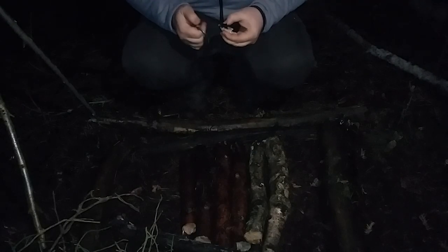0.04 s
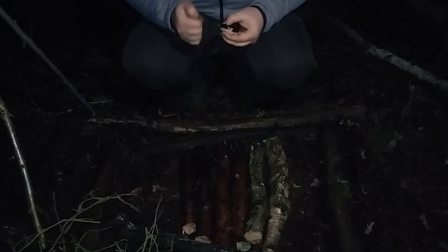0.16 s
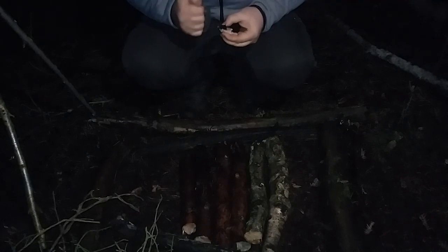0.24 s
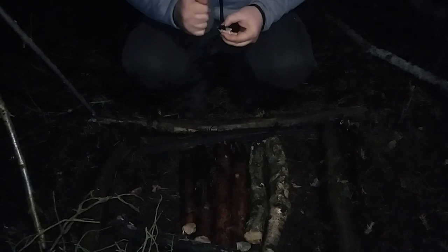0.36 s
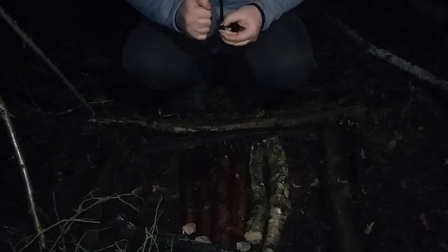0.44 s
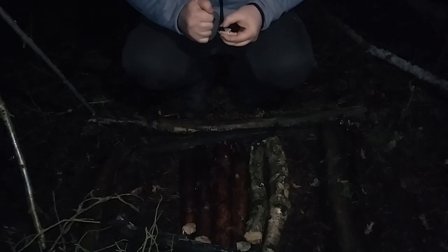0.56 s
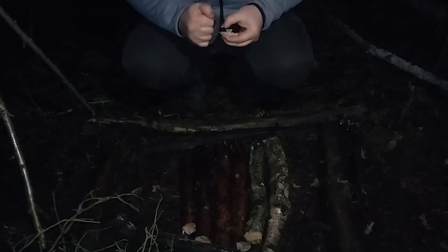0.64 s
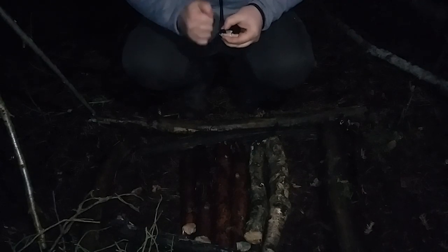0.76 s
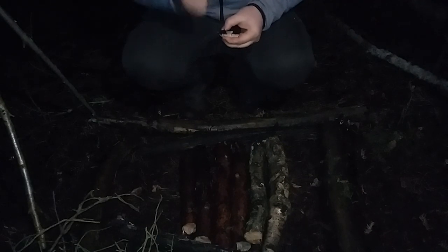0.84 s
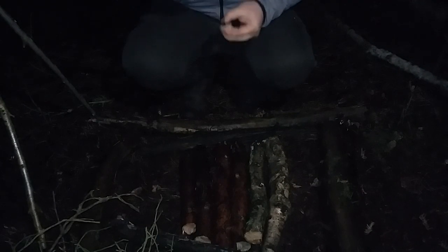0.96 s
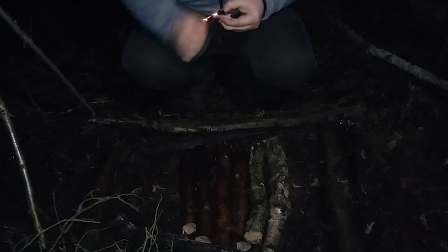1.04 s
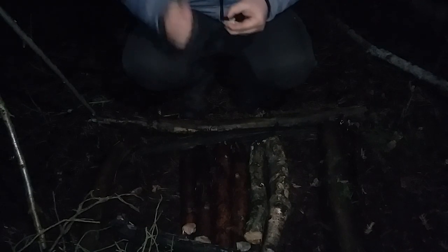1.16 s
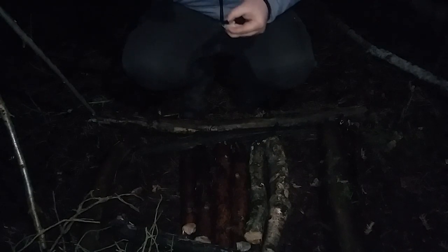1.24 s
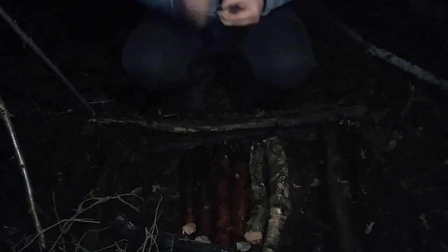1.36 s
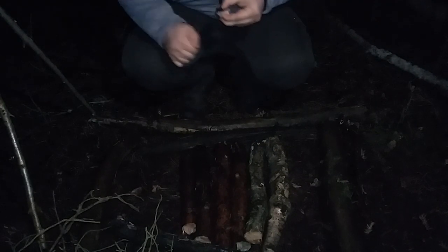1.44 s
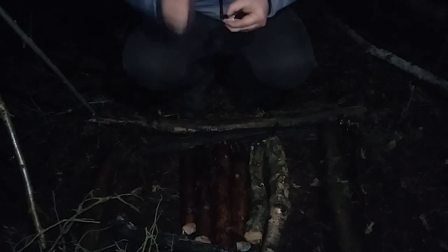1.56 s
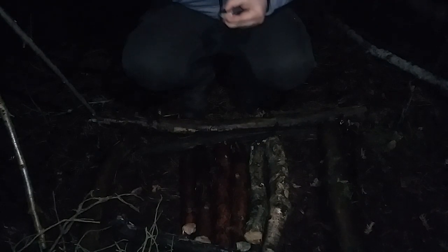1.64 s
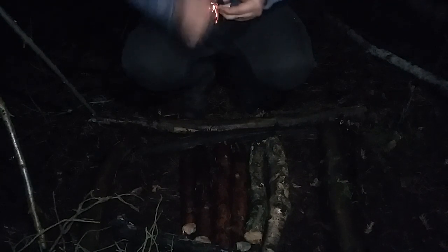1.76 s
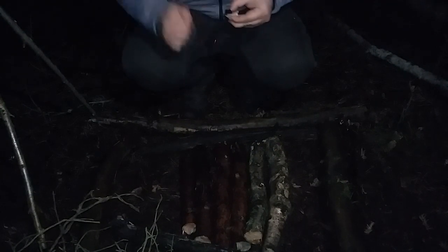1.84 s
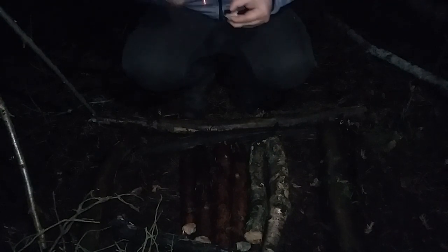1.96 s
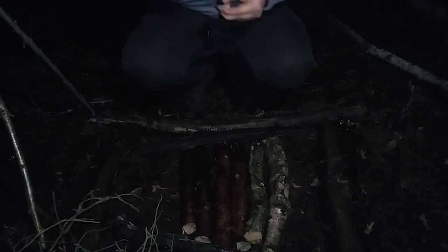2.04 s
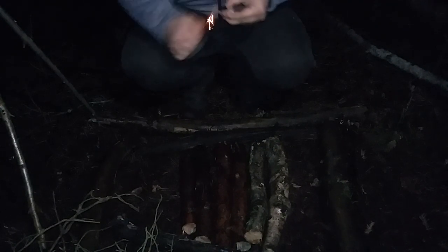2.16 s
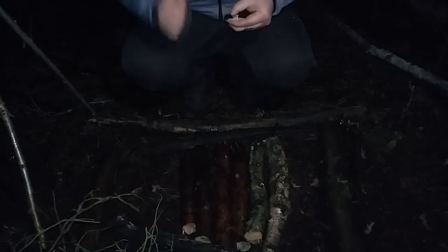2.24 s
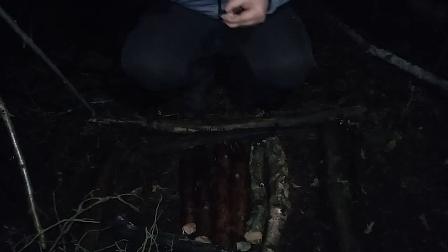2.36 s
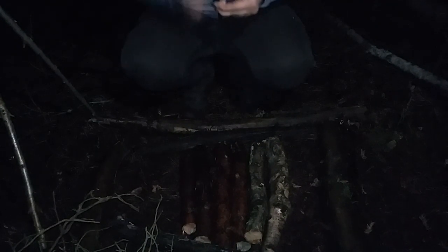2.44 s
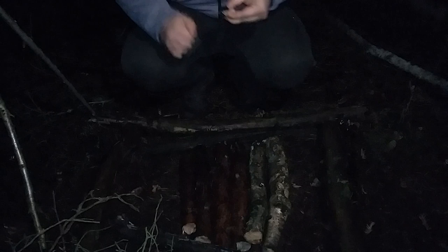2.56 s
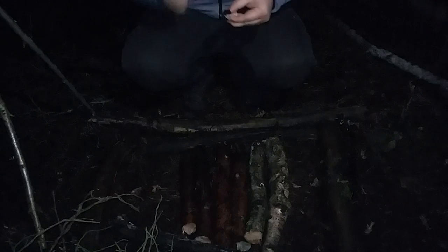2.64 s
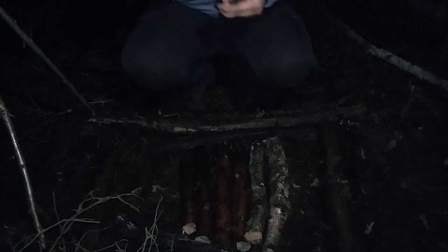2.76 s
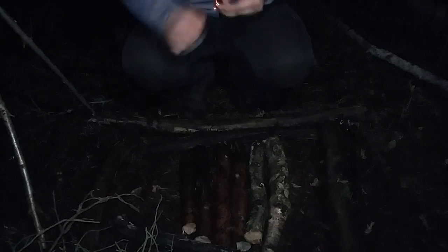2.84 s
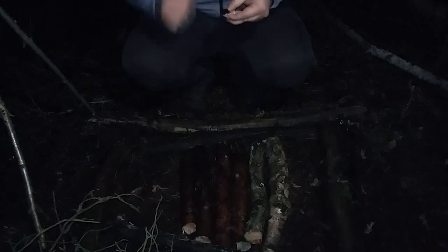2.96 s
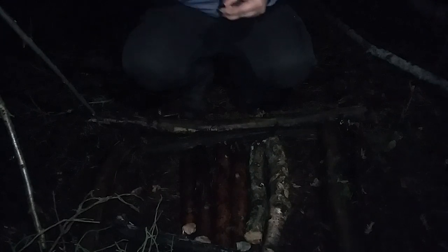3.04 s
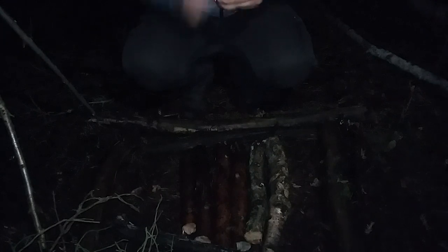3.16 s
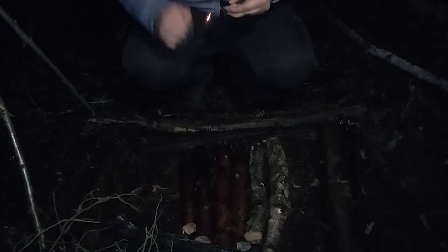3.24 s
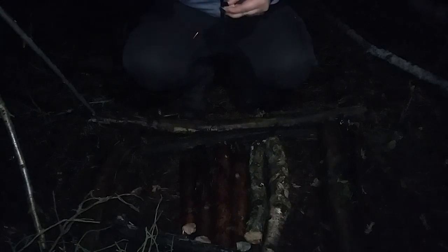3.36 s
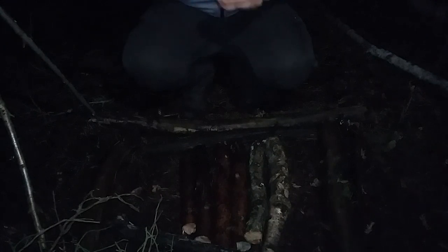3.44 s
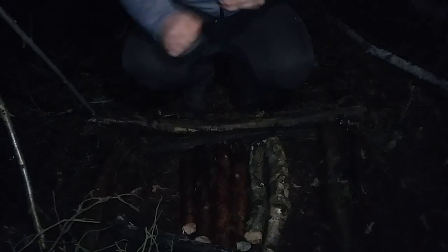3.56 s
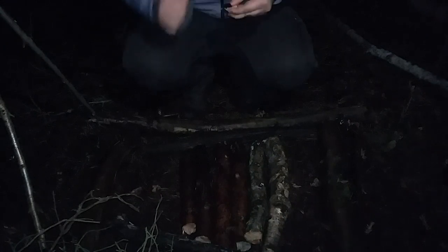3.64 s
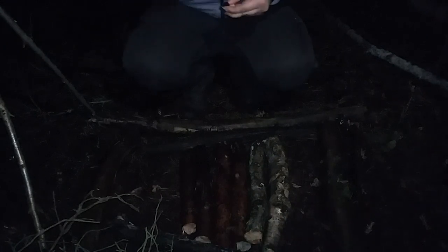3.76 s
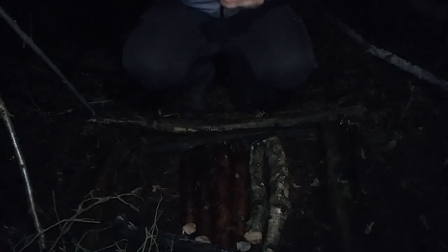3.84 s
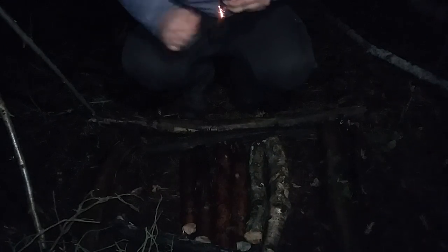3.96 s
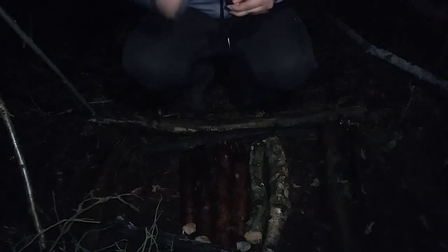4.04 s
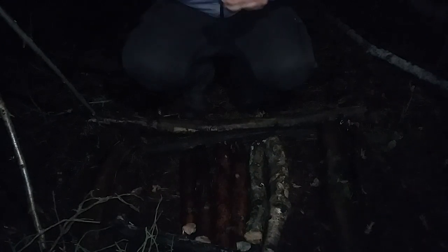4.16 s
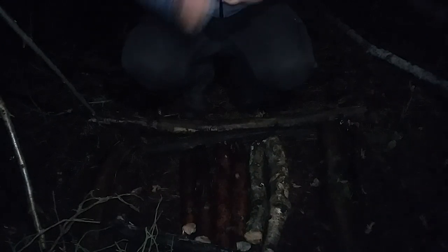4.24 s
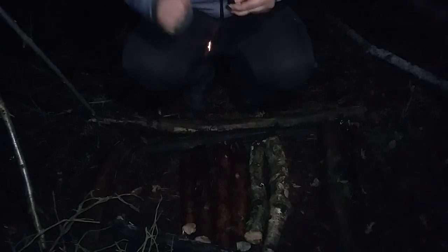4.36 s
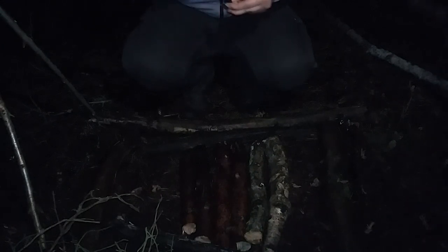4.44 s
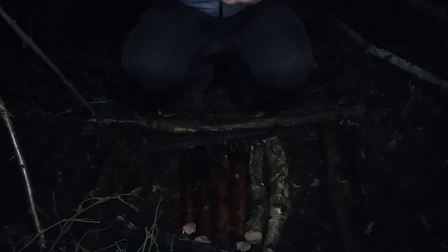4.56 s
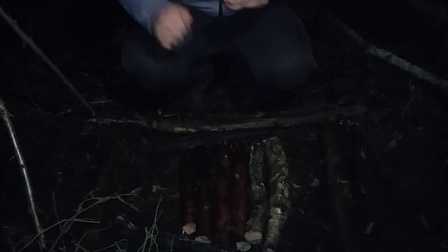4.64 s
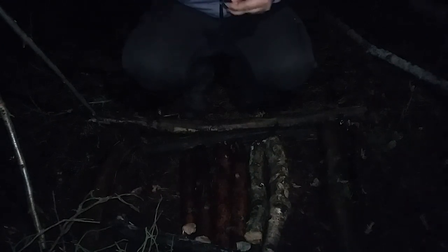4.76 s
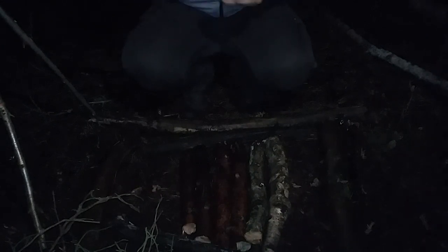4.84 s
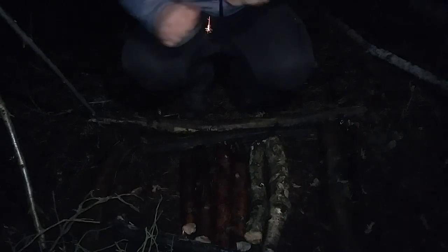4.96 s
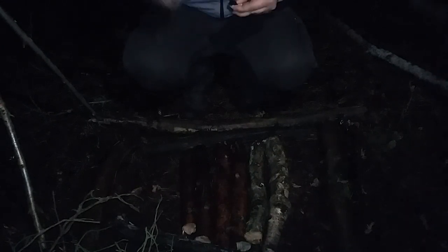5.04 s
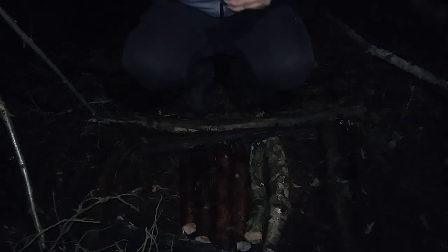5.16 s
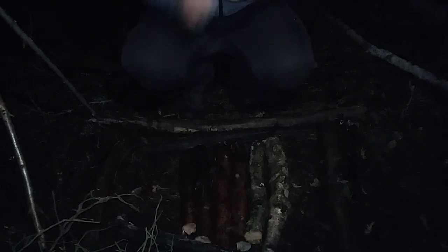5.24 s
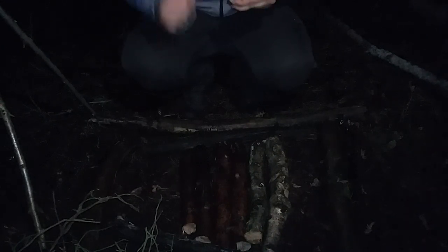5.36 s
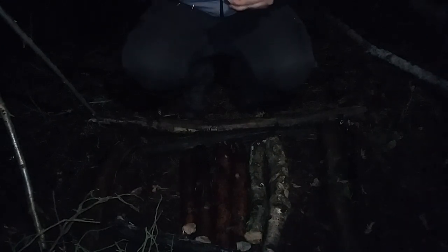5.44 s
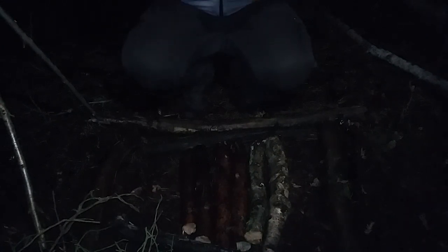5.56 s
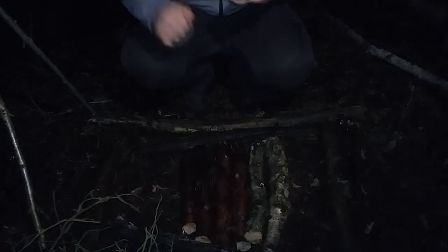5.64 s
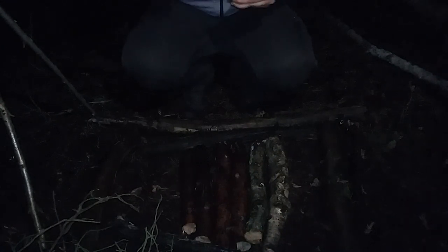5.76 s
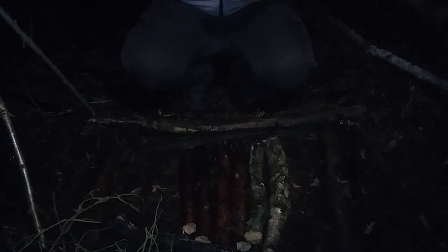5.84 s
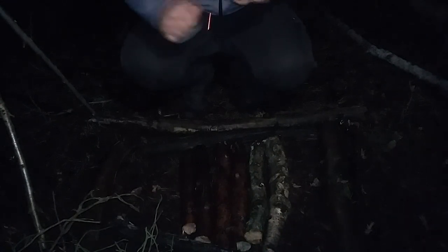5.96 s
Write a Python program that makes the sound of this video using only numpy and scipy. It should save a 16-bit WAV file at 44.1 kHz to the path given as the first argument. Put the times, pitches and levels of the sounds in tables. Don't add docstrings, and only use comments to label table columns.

```python
import sys
import numpy as np
from scipy import signal
from scipy.fft import irfft, next_fast_len
from scipy.io import wavfile
from scipy.ndimage import uniform_filter1d

SR = 44100
rng = np.random.default_rng(int(sys.argv[2]) if len(sys.argv) > 2 else 0)


def invert_db(level):
    return 10 ** (np.asarray(level, dtype=float) / 20)


def generate_wav(sig):
    pcm = np.round(np.clip(np.atleast_2d(sig).T, -1, 1) * 32767).astype(np.int16)
    wavfile.write(sys.argv[1], SR, pcm)


N = 265041

# (time [s], peak level [dB], rod ring [Hz], looseness of grip [dB], sharpness of the cut [dB])
BITES = [(0.614, -29.5, 3000, -2, -49), (1.0983, -14, 3270, -1, -10.5), (1.4478, -17.5, 2660, 4.5, -4.5),
         (1.8154, -8, 2750, -2, -2), (2.1735, -6, 2930, -2.5, -3), (2.544, -7, 2584, -1.5, 1.5),
         (2.8878, -4.5, 2900, -3, 1.5), (3.234, -9, 2680, 0.5, 0), (3.5711, -7.5, 2710, 1, 5.5),
         (3.9698, -6.5, 2800, -6.5, -14), (4.317, -9.5, 2500, 4, 7), (4.6565, -7, 2690, 0, -13.5),
         (4.9813, -11.5, 3050, 5.5, -15.5), (5.3263, -9.5, 2790, 3.5, 8), (5.6535, -6, 2760, 1, 1.5),
         (5.9718, -14, 2600, 7, 4.5)]

# (centre [Hz], width [Hz], level [dB], left minus right [dB])
HANDLE = [
    (1350, 160, 0, -1),
    (1860, 161, 0, -7),
]
STRIKER = [
    (3667, 560, 6.5, 4.3),
    (3900, 53, 2.5, 9.3),
    (3740, 400, -19, 2.4),
]
TIP = [
    (5400, 4500, -6.5, 4),
    (6050, 320, -11.5, 4.8),
    (6150, 610, 3, 1.9),
    (6550, 500, 3, 3.4),
]
EDGE = [
    (8250, 440, -6, 5),
    (8760, 260, -3, 6),
]
# (centre [Hz], width [Hz], level [dB], left minus right [dB])
TEARING = [
    (10500, 500, -6.5, -7),
    (12700, 1200, 2, 5.5),
    (14800, 1300, -5, -2.5),
]

BUFFER, LEAD_S = 4096, .005


def level(x, db):
    return x * invert_db(db) / np.sqrt(np.mean(x ** 2))


def ring(x, hz, width_hz):
    return signal.lfilter(*signal.iirpeak(hz, hz / width_hz, fs=SR), x)


def edge(x, hz, kind, order=2):
    return signal.sosfilt(signal.butter(order, hz, kind, fs=SR, output="sos"), x)


def walk(rate):
    hold = int(SR / rate)
    held = np.repeat(rng.standard_normal(N // hold + 1), hold)
    return 1.3 * uniform_filter1d(uniform_filter1d(held, hold), hold)[:N]


def curve(table):
    times, *columns = np.transpose(table)
    return [np.interp(np.arange(N) / SR, times, column) for column in columns]


def coloured(shape, lo_hz, hi_hz):
    size = next_fast_len(N)
    ln_hz = np.log(np.maximum(np.fft.rfftfreq(size, 1 / SR), 1))
    shape_hz, shape_db = np.transpose(shape)
    db = np.interp(ln_hz, np.log(shape_hz), shape_db)
    low_edge = 1 + np.exp(8 * (np.log(lo_hz) - ln_hz))
    high_edge = 1 + np.exp(8 * (ln_hz - np.log(hi_hz)))
    real, imaginary = rng.standard_normal((2, len(db)))
    spectrum = (real + 1j * imaginary) * invert_db(db) / np.sqrt(low_edge * high_edge)
    return level(irfft(spectrum, size)[:N], 0)


def pan_gain(pan_db):
    return invert_db(np.array([[pan_db], [-pan_db]]) / 2)


def body(force, modes):
    out = 0
    for k, (hz, width_hz, db, pan_db) in enumerate(modes):
        out = out + (-1) ** k * invert_db(db) * pan_gain(pan_db) * ring(force, hz, width_hz)
    return out / np.abs(out).max()


def grit(envelope, scatter_db):
    sign, size = rng.standard_normal((2, BUFFER))
    return envelope * sign * invert_db(scatter_db * np.abs(size))


def regrip(modes):
    detune = 1 + .03 * np.tanh(rng.standard_normal())
    return [(hz * detune, *rest) for hz, *rest in modes]


def place(out, sound, s):
    start = int((s - LEAD_S) * SR)
    out[:, start:start + BUFFER] += sound


def bites():
    # (level [dB], change per looseness [dB/dB], change per sharpness [dB/dB])
    parts = [
        (-13.5, 1.3, .01),
        (-4, 1.14, 0.25),
        (-16.5, -0.06, .4),
        (-23.5, -0.35, 1.1),
        (-40.5, 0.7, 0.1),
    ]
    out = np.zeros((2, N + 8192))
    ms = (np.arange(BUFFER) / SR - LEAD_S) * 1000
    run_up = .06 * np.exp(np.minimum(ms, 0) / .55)
    trail = np.exp(-ms / 2.07) + 0.066 * np.exp(-ms / 11)
    skid = np.where(ms < 0, run_up, trail)
    impact = np.arange(BUFFER) == np.searchsorted(ms, 0)
    for s, db, rod_hz, loose_db, sharp_db in BITES:
        grains = invert_db(-19.5) * grit(skid, 5.7)
        force = grains + impact
        push = edge(force, 5200, "low")
        rings = [body(push, HANDLE), body(push, regrip(STRIKER)), body(push, regrip(TIP)),
                 body(force, regrip(EDGE)), body(grains, TEARING)]
        sound = invert_db(-2) * body(push, [(rod_hz, 512, 0, -3), (2382, 300, 2.5, -2)])
        for part, (base_db, per_loose, per_sharp) in zip(rings, parts):
            sound = sound + invert_db(base_db + per_loose * loose_db + per_sharp * sharp_db) * part
        place(out, invert_db(db) * pan_gain(1.4) * sound, s)
    return out[:, :N]


def catches():
    # (time [s], level [dB], ring [Hz], length [ms])
    edge_catches = [(1.4512, -19, 2750, .7), (1.4583, -24.5, 3770, 4), (1.461, -26.5, 2720, 4),
                    (1.8187, -15, 2360, 3.9), (1.8262, -19.5, 2420, 1.5), (1.83, -31, 2330, 3),
                    (2.184, -18.5, 2430, 2.1), (2.188, -22.5, 2400, 2.8), (2.5533, -14.5, 2570, 2.2),
                    (2.8909, -19, 2580, 1.5), (2.899, -22.5, 1880, 3.2), (3.2472, -21.5, 2680, 6),
                    (3.5771, -17.5, 3000, 3.4), (3.5792, -12.5, 3050, 2.7), (3.5879, -21.5, 1880, 4),
                    (3.968, -16, 2810, .6), (3.9714, -17.5, 2630, 2.7), (3.976, -20, 2430, 2.1),
                    (3.9795, -13, 2510, 2.1), (4.3282, -26, 2470, 1.6), (4.332, -18, 2743, 1.5),
                    (4.6628, -18, 3370, 1.8), (4.6656, -26, 2553, 1.5), (4.9926, -26.5, 2170, 6),
                    (5.333, -30.5, 2700, 3), (5.652, -14, 3900, .4), (5.6567, -20, 2780, 1.1),
                    (5.6606, -19, 2670, 2.1), (5.9797, -18, 2980, 6), (5.9863, -14.5, 2720, 3.3)]
    out = np.zeros((2, N + 8192))
    ms = (np.arange(BUFFER) / SR - LEAD_S) * 1000
    for s, db, rod_hz, length_ms in edge_catches:
        skid = np.exp(-.5 * (ms / (.45 * length_ms)) ** 2)
        grains = grit(skid, 4.0)
        push = edge(grains, 4500, "low", order=3)
        sound = body(push, [(rod_hz, 320, 0, -1.5)])
        sound += invert_db(-6) * body(push, STRIKER + TIP)
        sound += invert_db(-33.5) * body(push, HANDLE)
        sound += invert_db(-42.5) * body(grains, EDGE + TEARING)
        place(out, invert_db(db - 1.0) * sound, s)
    return out[:, :N]


def sparks():
    # (frequency [Hz], level [dB/Hz])
    fizz = [
        (1500, -9),
        (2600, -6),
        (4100, -2),
        (5500, -11.5),
        (7000, -17),
        (9000, -20.5),
        (11000, -30.5),
        (16000, -41.5),
    ]
    t = np.arange(N) / SR
    glow = 0
    for s, peak_db, *_, sharp_db in BITES:
        db = peak_db - 50.5 + 0.37 * sharp_db
        age = np.maximum(t - s, 0)
        flare = np.minimum(age / .02, 1)
        glow = glow + invert_db(db) * flare * np.exp(-np.log(1000) * age / 0.74)
    return glow * np.array([invert_db(2.5 * walk(68)) * coloured(fizz, 1200, 20000) for _ in range(2)])


def wood(dry):
    # (level [dB], t60 [s], low edge [Hz], high edge [Hz])
    echoes = [
        (-9.5, 0.025, 1000, 21000),
        (-22, 0.44, 3340, 6900),
        (-25.5, 1, 4000, 5500),
    ]
    t = np.arange(N) / SR
    left, right = edge(dry, 4540, "low", order=1)
    ground = np.array([invert_db(-9) * np.interp(t - .00137, t, left), invert_db(-4.5) * np.interp(t - .001417, t, right)])
    t = t[:SR]
    tail = 0
    for db, t60, thin_hz, dull_hz in echoes:
        fade = np.exp(-np.log(1000) * t / t60) * np.minimum(t / .004, 1)
        scatter = rng.standard_normal((2, SR)) * fade
        band = edge(edge(scatter, dull_hz, "low"), thin_hz, "high", order=3)
        tail = tail + invert_db(db) * band / np.sqrt(np.sum(scatter[0] ** 2))
    return dry + ground + signal.fftconvolve(dry, tail, axes=1)[:, :N]


def sleeve():
    # (time [s], level [dB])
    rustle = [
        (0, -91),
        (.22, -92),
        (.42, -74.5),
        (.63, -79),
        (.72, -64.5),
        (.79, -94),
        (1.0, -78),
        (1.3, -73),
        (1.6, -99),
    ]
    grain = rng.standard_normal((2, N)) * invert_db(1.2 * walk(60))
    grain = grain + 0.93 * grain.mean(axis=0)
    cloth = 0
    for hz, width_hz, db in [(2800, 500, 0), (2200, 800, -4), (3800, 600, -8), (5000, 250, -7)]:
        cloth = cloth + invert_db(db) * ring(ring(grain, hz, width_hz), hz, width_hz)
    return invert_db(curve(rustle)[0]) * level(cloth, 1)


def aircraft():
    # (time [s], roar level [dB], roar centre [Hz], clearness of the air path [dB])
    plane = [(0.0, -56, 326, 0.5), (0.05, -61, 260, 2), (0.95, -59.5, 236, 1.2), (1.34, -53, 243, -0.3),
             (1.79, -49.5, 318, -2.2), (2.14, -49.5, 237, -0.8), (3.0, -50, 234, -0.35),
             (3.21, -50.5, 290, -0.16), (3.68, -56, 238, 1.05), (4.42, -49, 241, -0.94),
             (4.74, -52.5, 232, 1.2), (4.77, -52, 280, 1.2), (5.41, -43, 267, -0.4), (5.98, -49, 273, 0.6),
             (6.01, -47.5, 244, 1.3)]
    # (frequency [Hz], level [dB/Hz])
    shared = [(15, -43), (25, -28), (64, 0), (88, 0), (161, -7.5), (358, -15.5), (426, -21), (784, -21),
              (1600, -41), (2080, -69.5), (3520, -120)]
    differing = [(15, -53), (25, -16), (80, -7), (129, -1.5), (184, -8.5), (268, -2.5), (424, -6),
                 (618, -3.5), (1090, -5.5), (1280, -8.5), (2650, -20.5), (3970, -23.5), (5340, -31),
                 (7380, -33), (15700, -37.5)]
    roar, roar_hz, clear_db = curve(plane)
    rumble = -50 + .1 * (roar + 50) - .4 * clear_db + 0.83 * walk(5.6)
    upper = -56.5 + 0.76 * (roar + 50) + 2.0 * clear_db
    upper_hz = 562 * (1 + .05 * walk(1.6))
    mid = invert_db(rumble) * coloured(shared, 20, 145)
    for low_hz, db, hump_hz, rise_db in ((174, roar, roar_hz, 5.7), (435, upper, upper_hz, 5.55)):
        for hz in low_hz * 2 ** np.arange(0, 1.5, .25):
            hump_db = rise_db * np.exp(-(np.log2(hz / hump_hz) / 0.3) ** 2)
            flutter_db = 1.5 * walk(4)
            band = coloured([(100, -0.5), (1600, -5.5)], hz, 0.93 * hz)
            mid += invert_db(db - 10.0 + hump_db + flutter_db) * band
    side = invert_db(-62) * coloured(differing, 20, 20000)
    side += invert_db(roar - 14.5) * coloured(differing, 230, 420)
    side += invert_db(upper - 5) * coloured(differing, 800, 1400)
    left_extra = invert_db(roar - 26.5) * coloured(shared, 150, 450)
    return np.array([mid + side + left_extra, mid - side])


def hiss():
    # (frequency [Hz], level [dB/Hz])
    hiss_shape = [(760, -30), (1300, -7.5), (1670, -1.5), (1870, -3), (2060, -2.5), (2720, -4),
                  (5540, -22.5), (7260, -20), (10500, -25), (15100, -20), (15700, -25.5)]
    return invert_db(-71) * coloured(hiss_shape, 890, 20000)


def scene():
    near = bites() + catches()
    near[1] = np.roll(near[1], 1)
    return invert_db(-2.0) * wood(near) + sparks() + sleeve() + aircraft() + hiss()


def roll_off(x):
    return signal.sosfilt(signal.butter(12, 16640, fs=SR, output="sos"), x)


def record(dry):
    top_cut = signal.ellip(8, .3, 24, 15800, fs=SR, output="sos")
    return roll_off(signal.sosfilt(top_cut, dry))


dry = scene()
out = record(dry)
generate_wav(out)
```